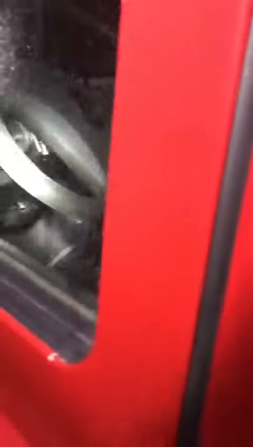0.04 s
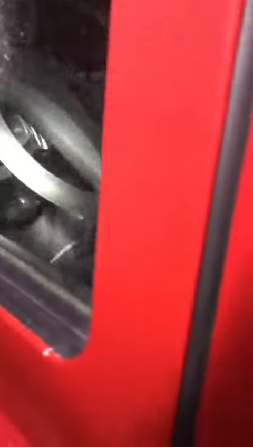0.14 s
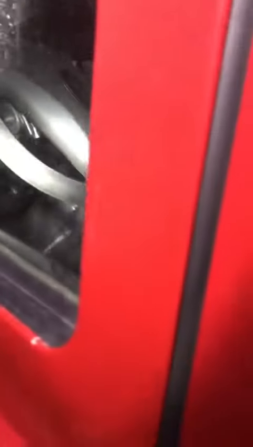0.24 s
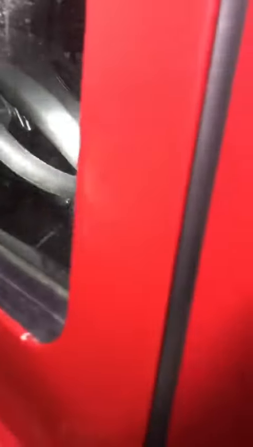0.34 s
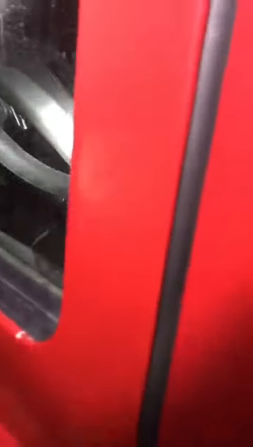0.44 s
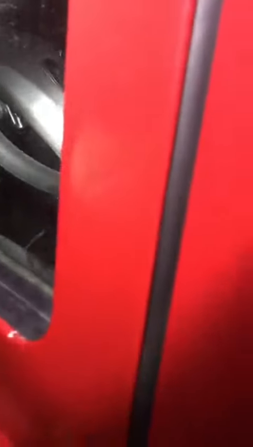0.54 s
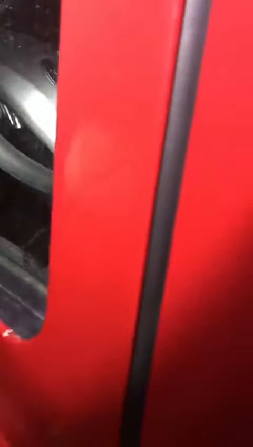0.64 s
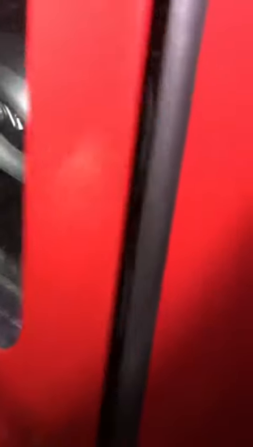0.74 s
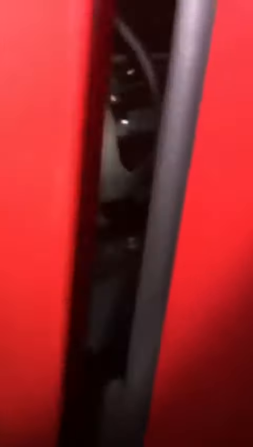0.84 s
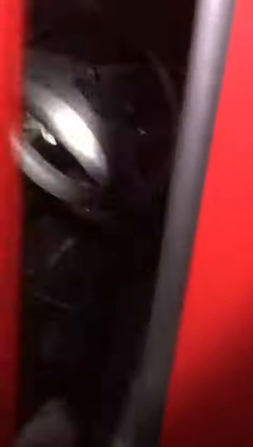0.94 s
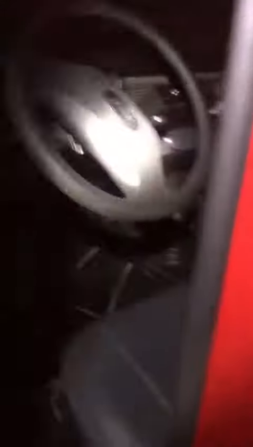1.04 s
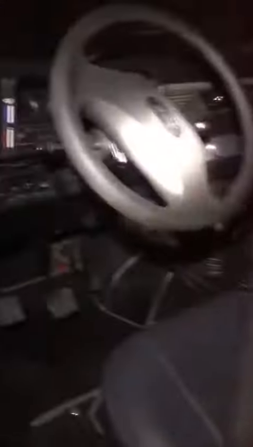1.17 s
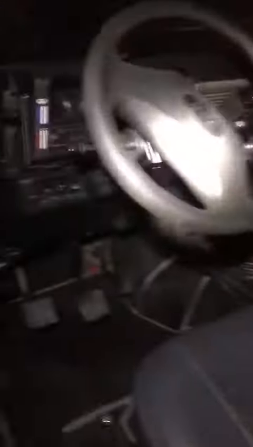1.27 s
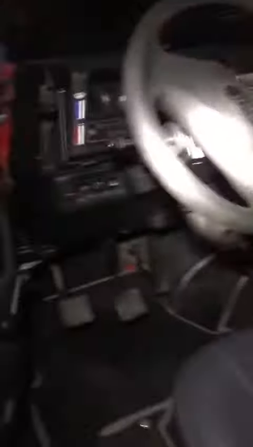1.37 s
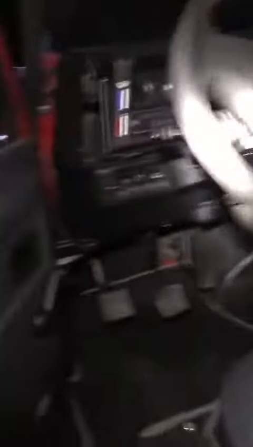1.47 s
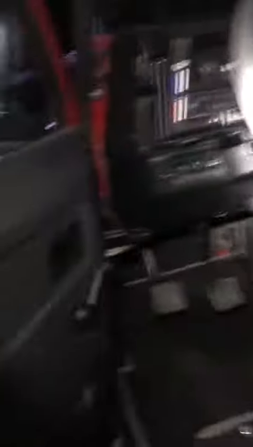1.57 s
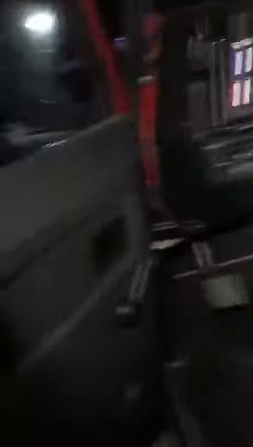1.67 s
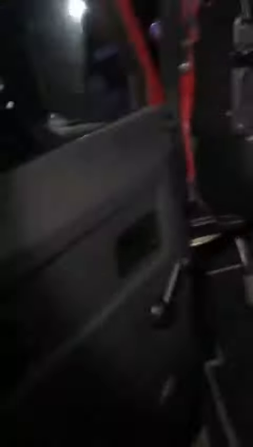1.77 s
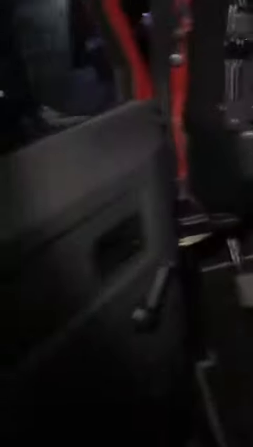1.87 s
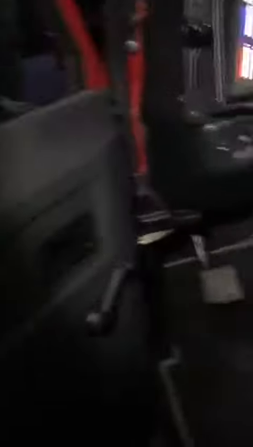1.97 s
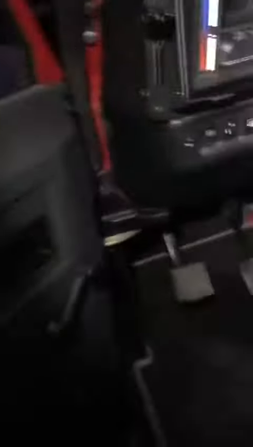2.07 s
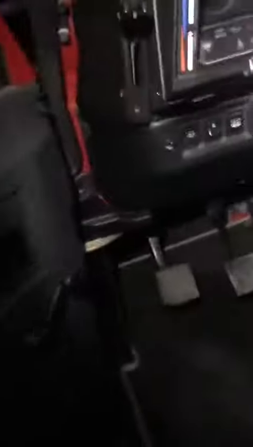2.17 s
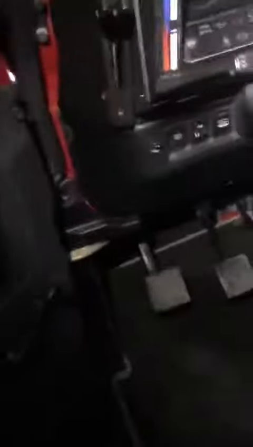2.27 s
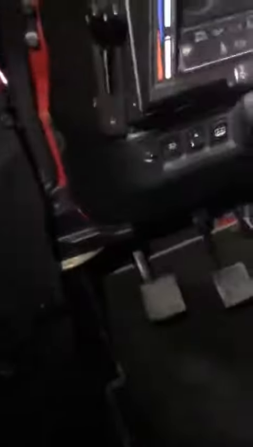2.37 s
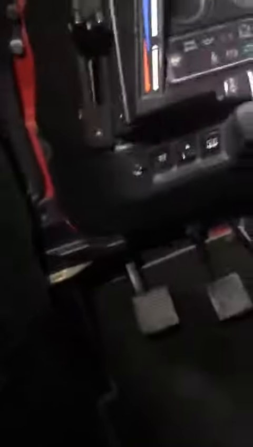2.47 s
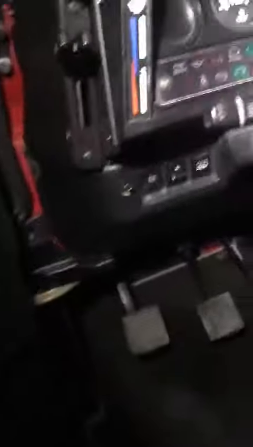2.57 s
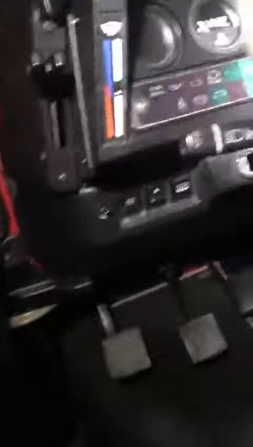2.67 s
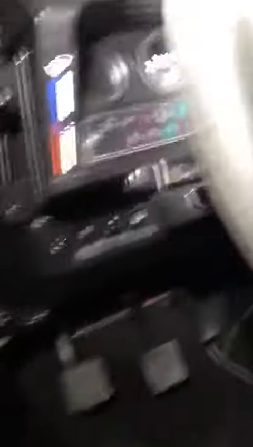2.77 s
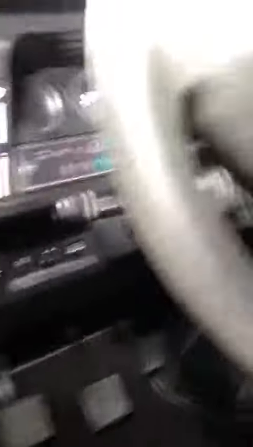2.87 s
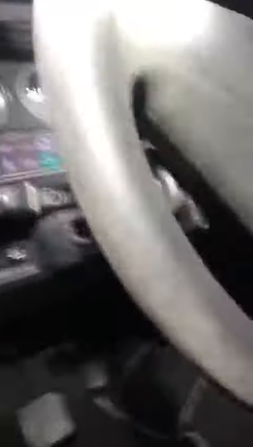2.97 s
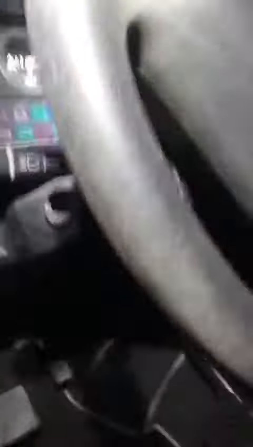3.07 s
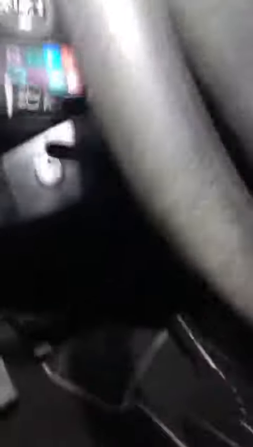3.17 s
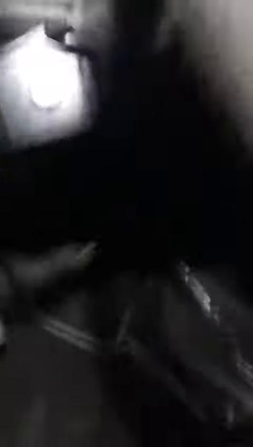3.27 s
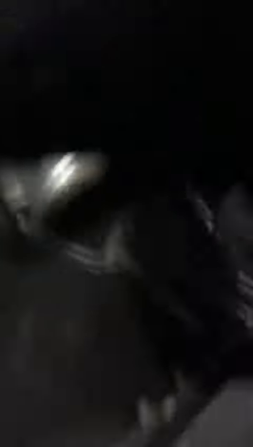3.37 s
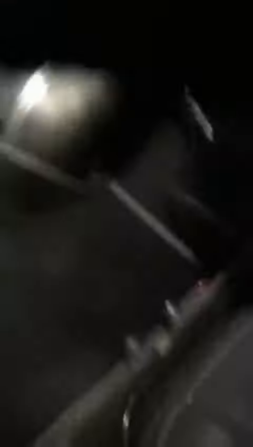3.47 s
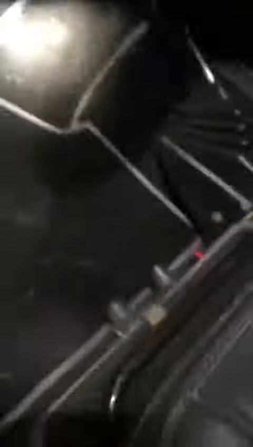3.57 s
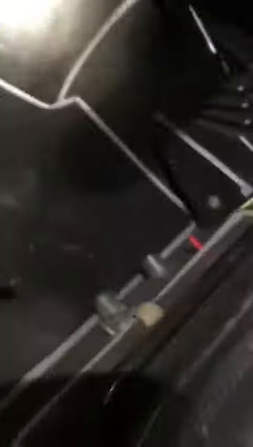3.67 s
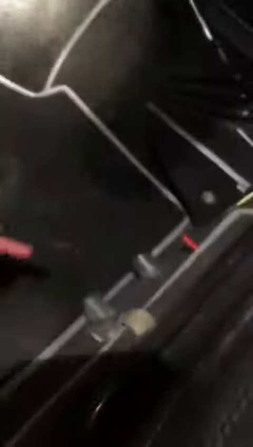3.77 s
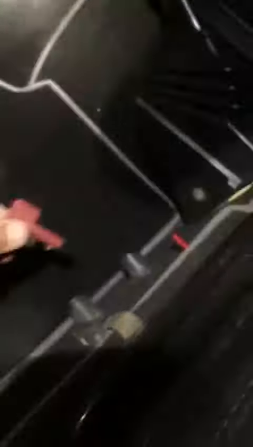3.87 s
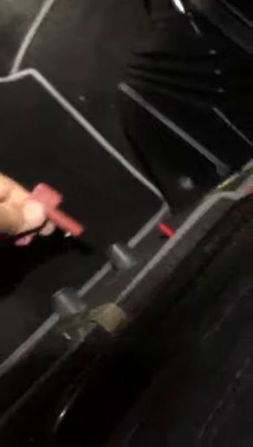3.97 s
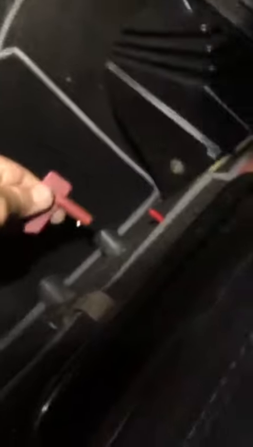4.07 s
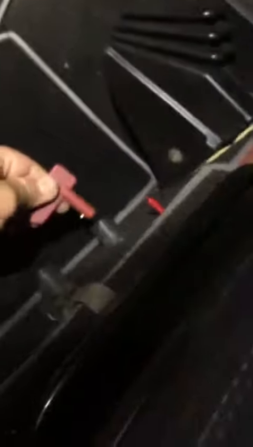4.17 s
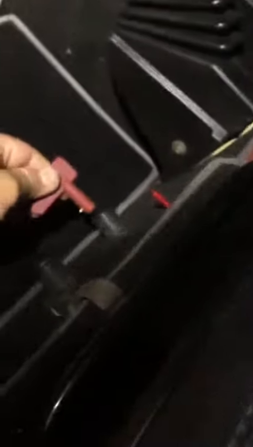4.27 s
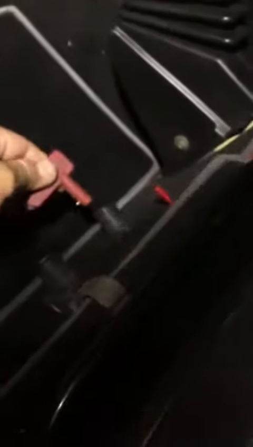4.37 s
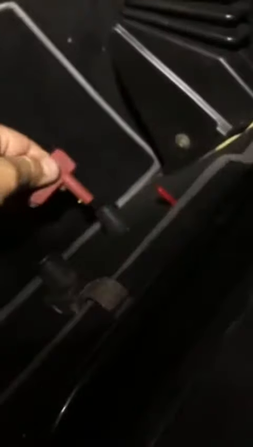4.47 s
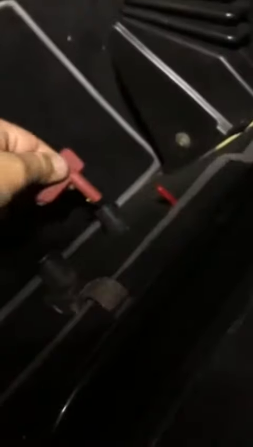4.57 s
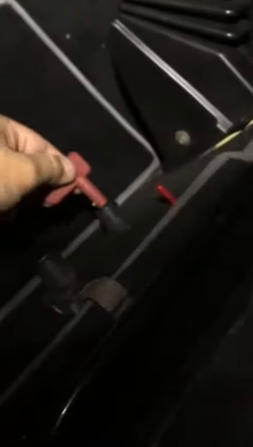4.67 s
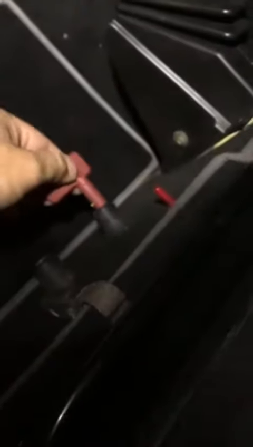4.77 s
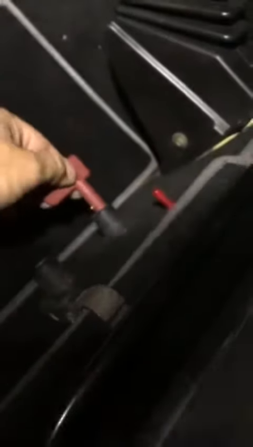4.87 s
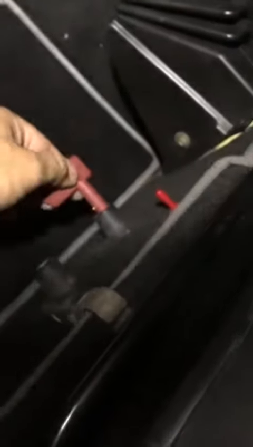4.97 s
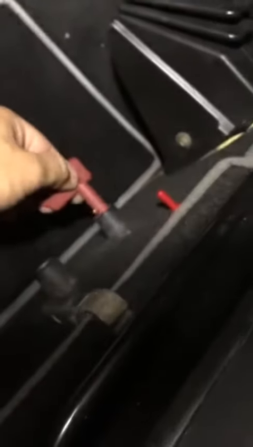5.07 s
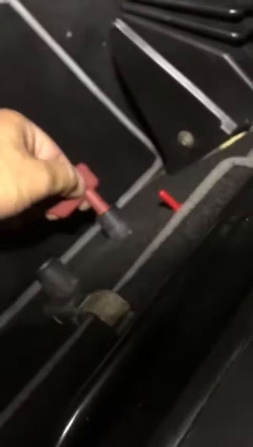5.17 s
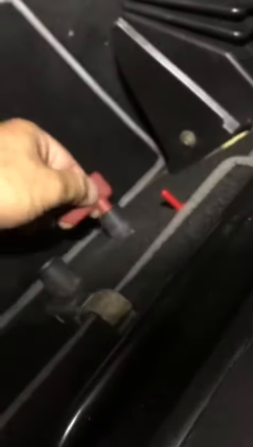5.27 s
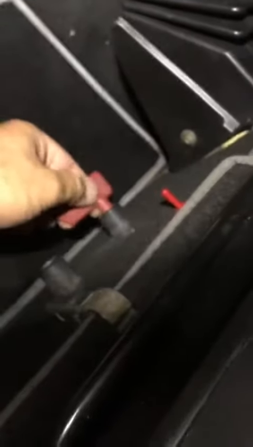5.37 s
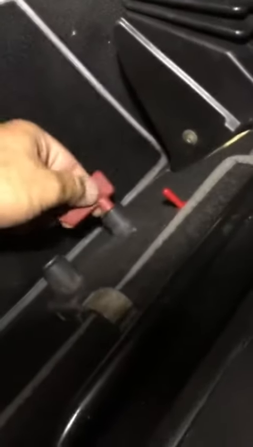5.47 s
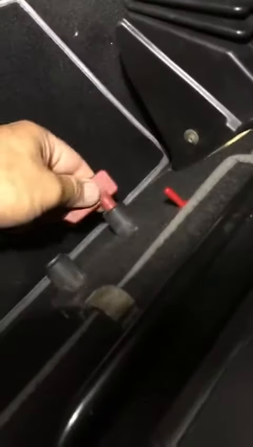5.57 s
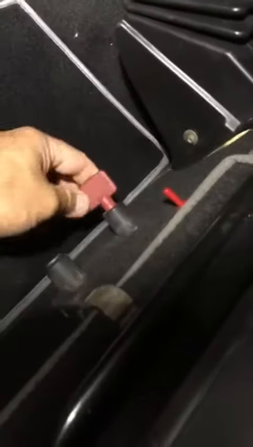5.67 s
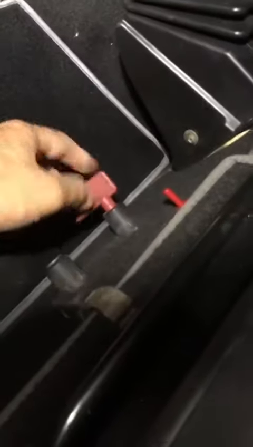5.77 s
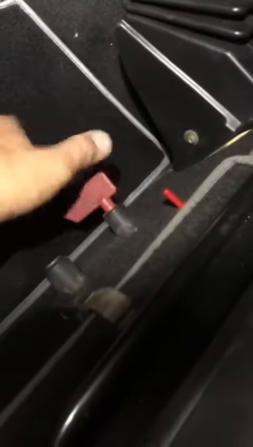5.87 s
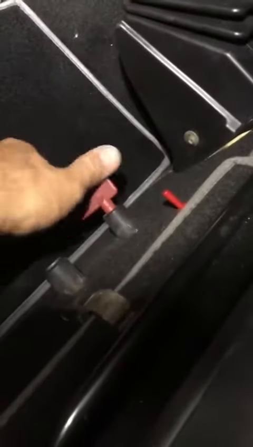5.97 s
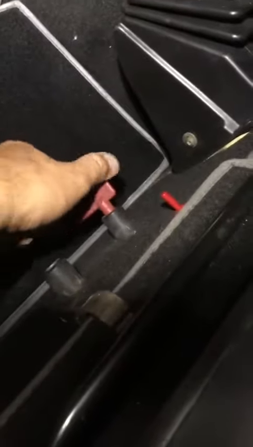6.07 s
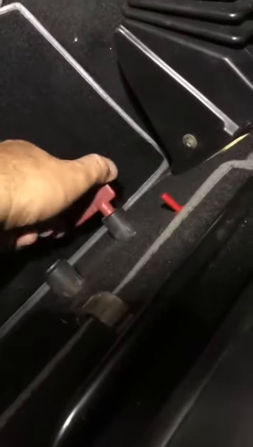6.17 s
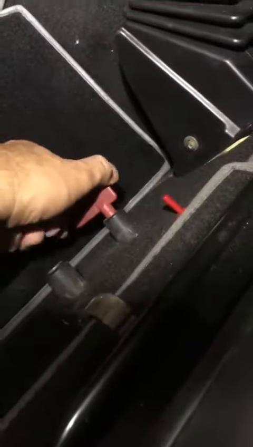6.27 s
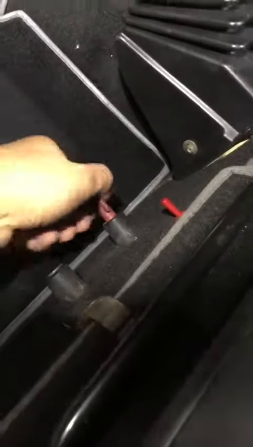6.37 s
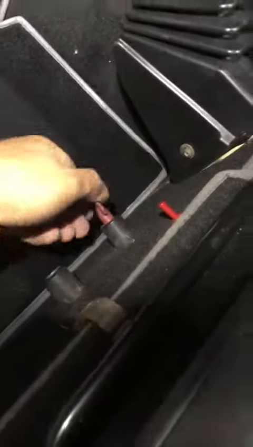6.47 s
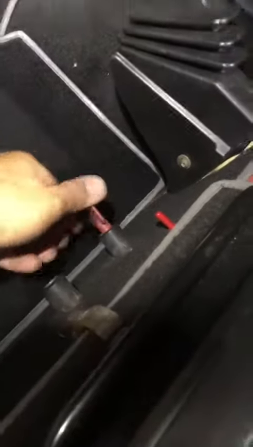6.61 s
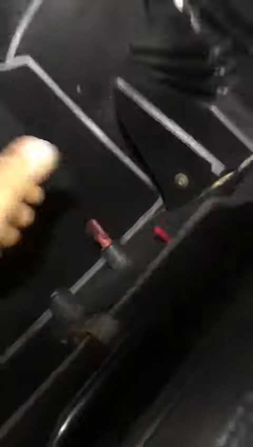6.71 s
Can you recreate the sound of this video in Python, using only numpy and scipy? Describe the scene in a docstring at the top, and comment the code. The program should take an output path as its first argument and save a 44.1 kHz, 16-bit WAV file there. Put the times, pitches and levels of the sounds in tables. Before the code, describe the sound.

Heavy cab door unlatches with a sharp metallic clack and low boom, followed by rustling, small trim knocks and a key clicking into its socket.

```python
"""A faint outdoor background runs throughout, with rustling cloth and small knocks on the trim near by.
The door of a truck cab is unlatched: the catch cracks open, the steel panel booms and the handle snaps back.
Someone leans in and pushes a plastic isolator key into its socket on the hollow cab floor.
Contacts are clicks with grit and a cab tail, some ringing resonances; the panel is a sum of decaying modes;
cloth, air and rumble are shaped noise."""
import sys
import numpy as np
from scipy import signal
from scipy.fft import rfft, irfft, next_fast_len
from scipy.io import wavfile
from scipy.ndimage import uniform_filter1d

SR = 44100
rng = np.random.default_rng(int(sys.argv[2]) if len(sys.argv) > 2 else 0)


def store_wav(level_fs):
    """Save 16-bit WAV to argv[1]."""
    pcm = np.round(np.clip(np.atleast_2d(level_fs), -1, 1) * 32767)
    wavfile.write(sys.argv[1], SR, pcm.T.astype(np.int16))


N = 297278
TIME = np.arange(N) / SR


def from_db(db):
    """Decibels to amplitude gain."""
    return 10 ** (np.asarray(db) / 20)


def rms_one(x):
    """Scale each row to rms 1."""
    return x / np.sqrt(np.mean(x ** 2, axis=-1, keepdims=True) + 1e-30)


def at_hz(points, hz):
    """Read a table along log frequency."""
    f, value = np.transpose(points)
    return np.interp(np.log(hz), np.log(f), value)


def add(out, s, sound):
    """Mix a sound in from time s, cutting what runs past the end."""
    start = int(round(s * SR))
    out[start:start + len(sound)] += sound[:len(out) - start]


def shaped(x, gain_db):
    """Give a noise the spectrum gain_db(Hz)."""
    size = next_fast_len(len(x))
    hz = np.maximum(np.fft.rfftfreq(size, 1 / SR), 1)
    return irfft(rfft(x, size) * from_db(gain_db(hz)), size)[:len(x)]


def resonate(x, modes):
    """Parallel two-pole resonances, each with its own peak gain."""
    out = 0
    for hz, width, db in modes:
        radius = np.exp(-np.pi * width / SR)
        numerator = [(1 - radius ** 2) / 2, 0, (radius ** 2 - 1) / 2]
        denominator = [1, -2 * radius * np.cos(2 * np.pi * hz / SR), radius ** 2]
        out = out + from_db(db) * signal.lfilter(numerator, denominator, x + 1e-18)
    return out


def near_walls(x, gain, longest_s, count=3):
    """Trim, glass and floor close by send back a few early echoes that colour each sound in its own way."""
    out = x.copy()
    for lag in rng.uniform(longest_s / 10, longest_s, count):
        add(out, lag, gain * rng.choice([-1, 1]) * x)
    return out


# Centres of the four parts of a contact sound, thump, knock, clack and tick: (frequency [Hz])
PARTS_HZ = [125, 460, 1800, 6400]


def tilted(parts_db, db_per_octave, pivot_hz):
    """Thump, knock, clack and tick levels, made brighter or duller about a pitch."""
    return np.array(parts_db) + db_per_octave * np.log2(np.array(PARTS_HZ) / pivot_hz)


# Response of the microphone: (frequency [Hz], gain [dB])
MICROPHONE = [(30, -12), (60, -7.5), (110, 0.5), (7500, 0), (9500, -4), (12000, -11.5)]


def colour_db(parts_db, hz):
    """Level at a pitch, between thump, knock, clack and tick, as the microphone takes it."""
    return np.interp(np.log(hz), np.log(PARTS_HZ), parts_db) + at_hz(MICROPHONE, hz)


EDGES = 31.25 * 2 ** (np.arange(19) / 2)   # half-octave band edges [Hz]
# Time for the cab's tail to fall 60 dB: (frequency [Hz], decay [s])
CAB_T60 = [(100, 0.3), (400, 0.21), (1500, 0.16), (5000, 0.099), (11000, 0.082)]


def contacts(rows, grit_db, tail_db, tail_tilt_db, echo_gain, size=16000):
    """Each row sounds as a click, a burst of grit while the parts touch, and a diffuse tail; lows arrive later.

    rows: (time [s], thump [dB], knock [dB], clack [dB], tick [dB], contact time [s], treble edge [Hz])
    """
    rows, t = np.array(rows), np.arange(size) / SR
    contact_s, treble_hz = np.maximum(rows[:, 5:6], 1e-4), rows[:, 6:7]
    noise = rng.standard_normal((len(rows), 2, size))
    click = rms_one(1.0 * (t == 0))
    grit = rms_one(noise[:, 0] * np.exp(-t / contact_s))
    touch = rms_one(click + from_db(grit_db) * grit)
    touch = rms_one(np.array([near_walls(x, echo_gain, longest_s=.0028) for x in touch]))
    sounds, out = 0, np.zeros(N)
    for k, (low, high) in enumerate(zip(EDGES, EDGES[1:])):
        hz = np.sqrt(low * high)
        tail = rms_one(noise[:, 1] * from_db(-60 * t / at_hz(CAB_T60, hz)))
        wet = from_db(tail_db - tail_tilt_db * np.log2(hz / PARTS_HZ[2]))   # upholstery soaks up the treble
        band_filter = signal.butter(2, [low, high], "band", fs=SR, output="sos")
        band = signal.sosfilt(band_filter, touch + wet * tail)
        gain = from_db([[colour_db(row[1:5], hz)] for row in rows])
        softness = 1 / np.sqrt(1 + (hz / treble_hz) ** 8)
        # 0 dB holds as much energy as a unit click has in this band
        unit_click = np.sqrt(2 * (high - low) / SR / size)
        sounds = sounds + (-1) ** k * gain * softness * rms_one(band) * unit_click
    for s, sound in zip(rows[:, 0], sounds):
        add(out, s, sound)
    return out


# Spectrum of the outdoor air: (frequency [Hz], relative level [dB])
AIR = [(15, -64.5), (25, -38), (48, -2.5), (124, 1), (219, -15.5), (262, -12), (323, -14.5), (407, -16.5),
       (440, -17.5), (513, -14), (1270, -17), (2070, -28), (6130, -44), (12000, -51.5), (15600, -79),
       (22000, -120)]
# Spectrum of the hiss of clothes near by: (frequency [Hz], relative level [dB])
HISS = [(880, -28.5), (1500, -2), (2810, -6), (3810, -5.5), (8700, -11), (11100, -13.5), (12000, -24.5),
        (15600, -51.5), (22000, -120)]
# Rise and fall of the soft hiss as the clothes move: (time [s], relative level [dB])
CLOTHES = [(1.4, -75.5), (2.6, -72.5), (2.69, -70.5), (3.09, -69), (3.38, -66.5), (3.62, -69.5),
           (3.93, -66.5), (4.18, -74), (4.91, -78), (6.47, -78), (6.74, -73.5)]
SHELTER_DB_PER_S = 1.63   # the open air fades as the microphone moves into the cab


def background(rumble_db, mid_db, hiss_db, split_hz):
    """Steady distant rumble and open air that fades inside the cab, with the soft hiss of clothes near by."""
    air = shaped(rng.standard_normal(N), lambda hz: at_hz(AIR, hz))
    low_filter = signal.butter(2, split_hz, "low", fs=SR, output="sos")
    high_filter = signal.butter(2, split_hz, "high", fs=SR, output="sos")
    rumble = rms_one(signal.sosfilt(low_filter, air))
    open_air = rms_one(signal.sosfilt(high_filter, air))
    cloth = rms_one(shaped(rng.standard_normal(N), lambda hz: at_hz(HISS, hz)))
    clothes_db = np.interp(TIME, *np.transpose(CLOTHES))
    outdoors = from_db(rumble_db) * rumble - from_db(mid_db - SHELTER_DB_PER_S * TIME) * open_air
    return outdoors + from_db(hiss_db + clothes_db) * cloth


# Rubs of cloth and hand: (start [s], end [s], relative level [dB], brightness [dB per octave])
RUBS = [(0.08, 0.189, -45, -6), (0.659, 0.737, -44, -5), (0.924, 0.998, -43, -6), (1.322, 1.354, -43, -3.5),
        (1.693, 1.737, -49.5, -2.5), (1.815, 1.902, -53.5, -2.5), (2.501, 2.533, -42, -2.5),
        (2.525, 2.582, -44, -1), (2.752, 2.82, -53, 0.1), (2.852, 2.931, -53.5, -5),
        (3.067, 3.289, -46, -6.5), (3.272, 3.5, -52, -5), (3.493, 3.608, -49, -3), (4.208, 4.284, -58, -12),
        (5.22, 5.333, -51.5, -3.5), (5.65, 5.704, -52.5, -3.5), (5.991, 6.052, -67.5, -1),
        (6.373, 6.43, -49.5, -3.5)]
# Colour of a rub, as thump, knock, clack and tick: (relative level [dB])
RUB_COLOUR_DB = [-5, -0.5, -1.5, 0]
# Hollow note of the seat when leant on: (frequency [Hz], width [Hz], gain [dB])
SEAT_MODES = [(239, 34.5, 4.5), (456, 120, -6)]
# Resonances of rubbed plastic trim: (frequency [Hz], width [Hz], gain [dB])
TRIM_MODES = [(820, 480, 4), (1810, 360, 1.5), (3299, 220, 0), (4970, 960, -5)]
RUB_ROUGH_DB = 3.0   # depth of the slips
RUB_GRAINS_PER_S, RUB_GRAIN_DB = 140, 10.5   # fibres catch and snap during a stroke
LEAN_S, LEAN_LENGTH_S, SEAT_DB = 3.07, 0.36, 13.5   # weight comes onto the seat and leaves it again


def rubs(level_db, edge_s, swell_db, scrape_db, size=90):
    """Cloth slides in uneven slips that swell and fade; strokes made while leaning stir the seat."""
    out = np.zeros(N)
    friction = rng.standard_normal(N)
    grip = rms_one(uniform_filter1d(rng.standard_normal(N), size))
    snaps = rng.random(N) < RUB_GRAINS_PER_S / SR
    friction = friction * (1 + from_db(RUB_GRAIN_DB) * snaps)
    for start, end, db, bright in RUBS:
        parts_db = db + tilted(RUB_COLOUR_DB, bright, pivot_hz=905)
        length = max(end - start, .01)
        edge = edge_s * np.sqrt(length / 0.23)   # long strokes start more gently
        near = (TIME > start - 4 * edge) & (TIME < end + 4 * edge)
        t = TIME[near]
        stroke = (np.tanh((t - start) / edge) - np.tanh((t - end) / edge)) / 2
        pressure = from_db(swell_db * (0.96 - np.abs(2 * (t - start) / length - 1)))   # firmest in mid stroke
        rough = friction[near] * from_db(RUB_ROUGH_DB * grip[near])
        slips = rms_one(near_walls(rough, gain=0.22, longest_s=0.002))
        out[near] += pressure * stroke * shaped(slips, lambda hz: colour_db(parts_db, hz))
    lean = np.exp(-((TIME - LEAN_S) / LEAN_LENGTH_S) ** 2)
    seat = resonate(from_db(SEAT_DB) * lean * out, SEAT_MODES)
    scrape = from_db(scrape_db) * resonate(out, TRIM_MODES)
    return from_db(level_db) * (out + seat + scrape)


# Dull bumps on the door lining and padded trim:
# (time [s], relative thump [dB], relative knock [dB], contact time [s])
BUMPS = [(0.389, -16, -4.5, 0.0027), (0.439, -1, -11.5, 0.0057), (0.507, -13.5, 0, 0.0056),
         (0.592, 2.5, 0.5, 0.025), (1.034, 6.5, 0.5, 0.016), (1.074, -12, -2.5, 0.023),
         (1.141, 5.5, 0.5, 0.017), (1.241, 6.5, -1, 0.01), (1.907, 0, -9.5, 0.0048),
         (2.044, -14, 5.5, 0.00084), (2.171, -32, -6.5, 0.00076), (2.312, -3, -7, .0004),
         (2.504, -11.5, -5.5, 0.0054), (2.864, -34.5, -3, 0.012), (3.148, 1, 6, 0.016),
         (3.197, 5, -1.5, 0.0024), (3.836, -17.5, -10.5, 0.0033), (4.029, 0, 0, 0.00021),
         (4.072, 5.5, -2.5, 0.019)]
# Hollow resonances of the door lining and trim panels: (frequency [Hz], width [Hz], gain [dB])
LINING_MODES = [(232, 45, 2.5), (427, 110, -7)]
# Hard clicks of the door linkage, fittings and key tip:
# (time [s], relative level [dB], brightness [dB per octave], contact time [s], treble edge [Hz])
CLICKS = [(0.4964, -2.5, -5, 0.0016, 6000), (.594, -13, 4.5, 0.0045, 4700), (0.9, -26.5, 9, 0.00058, 8800),
          (0.946, -20, 7.5, .005, 6600), (1.0225, -10, 6.5, 0.00091, 12100),
          (1.032, -10.5, 4.5, 0.0085, 11000), (1.329, -16, 0, 0.0061, 10000),
          (1.695, -32, -3, .0015, 10000), (2.141, -35, 10, 0.0033, 10000),
          (2.171, -21.5, -0.5, 0.00066, 4830), (2.506, -13, -4, 0.0062, 2980),
          (2.614, -25.5, 7.5, .0015, 5050), (2.865, -24, 4.5, 0.0029, 5000),
          (4.331, -12.5, 4.5, 0.0011, 4130), (6.384, -29, -2.5, .002, 11000)]
# Colour of a hard click, as thump, knock, clack and tick: (relative level [dB])
CLICK_COLOUR_DB = [-11, -13, 0.5, -10]
# Short resonances of the hard parts: (frequency [Hz], width [Hz], gain [dB])
HARD_MODES = [(1750, 160, -6), (2400, 480, -4), (3400, 740, -4)]
BUMP_CLACK_DB, BUMP_TICK_DB = -18.5, -30   # relative to the knock
SOFT_EDGE_HZ, SCUFF_S = 730, .001   # a clean touch has little treble; a longer, scuffing one has more


def knocks_and_clicks(bump_db, click_db, ring_db):
    """Dead little bumps set padded, hollow parts ringing, and clicks set hard ones ringing."""
    bumps = []
    for s, thump, knock, touch in BUMPS:
        edge = SOFT_EDGE_HZ * (1 + (touch / SCUFF_S) ** 2)
        bumps.append((s, thump, knock, knock + BUMP_CLACK_DB, knock + BUMP_TICK_DB, touch, edge))
    clicks = []
    for s, db, bright, touch, edge in CLICKS:
        parts_db = db + tilted(CLICK_COLOUR_DB, bright, pivot_hz=1808)
        clicks.append((s, *parts_db, touch, edge))
    dull = contacts(bumps, grit_db=7, tail_db=-10, tail_tilt_db=1.57, echo_gain=0.12)
    hard = contacts(clicks, grit_db=6, tail_db=-9, tail_tilt_db=2.9, echo_gain=0.97)
    padded = from_db(bump_db) * dull + from_db(ring_db) * resonate(dull, LINING_MODES)
    return padded + from_db(click_db) * (hard + resonate(hard, HARD_MODES))


# The catch letting go, then a first knock of the handle at 0.769 s, levels relative: (time [s], thump [dB],
# knock [dB], clack [dB], tick [dB], # contact time [s], treble edge [Hz])
CATCH = [(.7135, -7, -2.5, -5, -2, 0.0018, 12000), (.7154, 7, 18.5, 12.5, 13.5, 0.001, 12000),
         (.7185, 11, 18.5, 12, 9, 0.0026, 10880), (.7445, 11.5, 12.5, -1, -6.5, 0.02, 10000),
         (.769, 7, 1, -4, -6, 0.0024, 11140)]
# Short resonances of the catch: (frequency [Hz], width [Hz], gain [dB])
CATCH_MODES = [(600, 44, 0.5), (1070, 15, 2), (1344, 18, 2), (1990, 90, 7), (2320, 170, 9),
               (2770, 110, 6.5), (2880, 53, 1), (3630, 140, 5.5), (4580, 45, 1.5), (5910, 70, 8.5),
               (6060, 80, 6), (6960, 80, 2.5), (7000, 110, 1), (8100, 90, 3.5), (9400, 120, 3)]


def catch_release(direct_db, ring_db):
    """The catch cracks open in a cluster of contacts, and a first knock of the handle follows; all excite these
    short resonances."""
    catch = contacts(CATCH, grit_db=5, tail_db=-9, tail_tilt_db=3.5, echo_gain=0.44)
    return from_db(direct_db) * catch + from_db(ring_db) * resonate(catch, CATCH_MODES)


# Jolts of the door as it springs off its seal: (time [s], relative level [dB])
JOLTS = [(0.7174, 0), (0.7397, -6.5), (0.7981, -8)]
# Modes of the door panel and the cab behind it: (frequency [Hz], relative level [dB], 60 dB decay [s])
PANEL = [(51, -34.5, 0.38), (130.2, -28, 0.98), (130.7, -21.5, 0.16), (184, -37.5, 0.95), (203, -8.5, 0.22),
         (218.3, -15, 0.28), (230.1, -8, 0.43), (236.3, -13.5, 0.3), (264, -32.5, 0.57), (323, -30, 0.22),
         (343.95, -21.5, 0.38), (420, -30.5, 0.15), (479, -39.5, 0.25), (585, -30.5, 0.12),
         (682, -36, 0.44)]


def door_panel(level_db, push_s):
    """Each jolt swells over a few milliseconds and leaves the panel booming."""
    out, t = np.zeros(N), np.arange(SR) / SR
    boom = sum(from_db(db - 60 * t / t60) * np.sin(2 * np.pi * hz * t) for hz, db, t60 in PANEL)
    swell = 1 - np.exp(-(t / push_s) ** 2)
    for s, db in JOLTS:
        add(out, s, from_db(db + level_db) * boom * swell)
    return out


def door_rumble(level_db, t60_s, swell_s, corner_hz, fall_db_per_octave):
    """The door's boom spreads through the cab shell and dies away as a diffuse rumble."""
    t = np.maximum(TIME - JOLTS[0][0], 0)   # from the first jolt

    def rumble_db(hz):
        """Flat below the corner and falling above it, as the microphone takes it."""
        return at_hz(MICROPHONE, hz) - fall_db_per_octave * np.log2(1 + (hz / corner_hz) ** 2) / 2

    noise = shaped(rng.standard_normal(N), rumble_db)
    return from_db(level_db - 60 * t / t60_s) * (1 - np.exp(-t / swell_s)) * rms_one(noise)


# The handle snapping back, with one bounce, levels relative: (time [s], thump [dB], knock [dB],
# clack [dB], tick [dB], contact time [s], treble edge [Hz])
HANDLE = [(.787, 4, -2.5, 5.7, -3.5, 0.00073, 8976), (.8015, 19, 15, 8.7, 4.5, 0.00087, 6944)]
# Ringing of the handle's steel: (frequency [Hz], width [Hz], gain [dB])
HANDLE_MODES = [(1290, 12, -5), (1620, 59.7, 4.5), (2030, 55.7, 5), (2370, 45, 7.5), (2850, 32, 5),
                (3620, 130, 4), (4410, 180, 13.5), (4470, 15, 17), (4570, 80, 8), (7180, 70, 17),
                (7840, 64, 13.5), (8080, 19, 16)]


def handle_return(direct_db, ring_db):
    """The handle's return and its bounce set its steel ringing."""
    handle = contacts(HANDLE, grit_db=-0.5, tail_db=-6.5, tail_tilt_db=4.0, echo_gain=0.25)
    return from_db(direct_db) * handle + from_db(ring_db) * resonate(handle, HANDLE_MODES)


# Key and knuckles against the socket:
# (time [s], relative push on the floor [dB], relative click [dB], contact time [s], treble edge [Hz])
KEY = [(4.6929, 10.5, -2.5, 0.0022, 2450), (5.1293, 13.5, 11.5, 0.0034, 10120),
       (5.154, 9, -9.5, 0.0014, 4980), (5.244, 16.5, -50, 0.00057, 1000),
       (5.3039, 15.5, 0.5, 0.0051, 12100), (5.316, 11, -43, 0.0012, 1000), (5.682, 4.5, -47, 0.0025, 3000),
       (5.717, 0, -14, 0.0033, 9000), (6.386, 6, -22.5, 0.0099, 11000), (6.431, 1, -27, .0036, 2000),
       (6.557, 6, -34, 0.0024, 2960)]
# Resonances of the floor around the socket: (frequency [Hz], width [Hz], gain [dB])
FLOOR_MODES = [(114, 28.4, 10), (371, 51, 8.5), (590, 44, -1.5), (727, 57, 2.5), (830.4, 78, 6),
               (1010, 49, 3.5), (1103, 45, 4), (1670, 130, -4), (1930, 140, -1), (2680, 73, -15),
               (3126, 252, -0.5), (3628, 147, -1.5), (4240, 61, -12)]
# the knock grows more slowly than the click, so light touches are dull
KEY_KNOCK_DB, KEY_KNOCK_SHARE, KEY_TICK_DB = 1.5, 0.56, -16


def isolator_key(direct_db, ring_db):
    """The key finds the socket and seats; the hollow floor answers."""
    touches = []
    for s, push, click, touch, edge in KEY:
        knock = KEY_KNOCK_DB + KEY_KNOCK_SHARE * click
        touches.append((s, push, knock, click, click + KEY_TICK_DB, touch, edge))
    key = contacts(touches, grit_db=-1.5, tail_db=-13.5, tail_tilt_db=2.1, echo_gain=0.61)
    return from_db(direct_db) * key + from_db(ring_db) * resonate(key, FLOOR_MODES)


def key_squeak(middle_s, length_s, hz, level_db):
    """The plastic shank gives a faint squeak as it turns: one tone that swells and fades."""
    swell = np.exp(-((TIME - middle_s) / length_s) ** 2)
    return from_db(level_db) * swell * np.sin(2 * np.pi * hz * TIME)


def scene():
    """Background, hands, door and key at one microphone."""
    outdoors = background(rumble_db=-61.5, mid_db=-56.5, hiss_db=2.5, split_hz=260)
    cloth = rubs(level_db=-2.5, edge_s=0.0067, swell_db=3.5, scrape_db=-5.0)
    knocks = knocks_and_clicks(bump_db=-1.5, click_db=-2.5, ring_db=-3)
    catch = catch_release(direct_db=-2.5, ring_db=-3.5)
    panel = door_panel(level_db=1.5, push_s=.004)
    shell = door_rumble(level_db=-38.5, t60_s=0.53, swell_s=.02, corner_hz=130, fall_db_per_octave=5)
    handle = handle_return(direct_db=0.5, ring_db=0.0)
    key = isolator_key(direct_db=-6.5, ring_db=-5.5)
    squeak = key_squeak(middle_s=5.425, length_s=0.028, hz=538, level_db=-55)
    return (outdoors + cloth + knocks + catch + panel + shell + handle + key + squeak)[None]


def record(dry):
    """The loudest peaks are rounded off and the top is cut above 12 kHz."""
    rounded = dry / (1 + (dry / .95) ** 6) ** (1 / 6)
    top_cut = signal.ellip(10, .2, 80, 12000, fs=SR, output="sos")
    return signal.sosfilt(top_cut, rounded)


dry = scene()
out = record(dry)
store_wav(out)
```